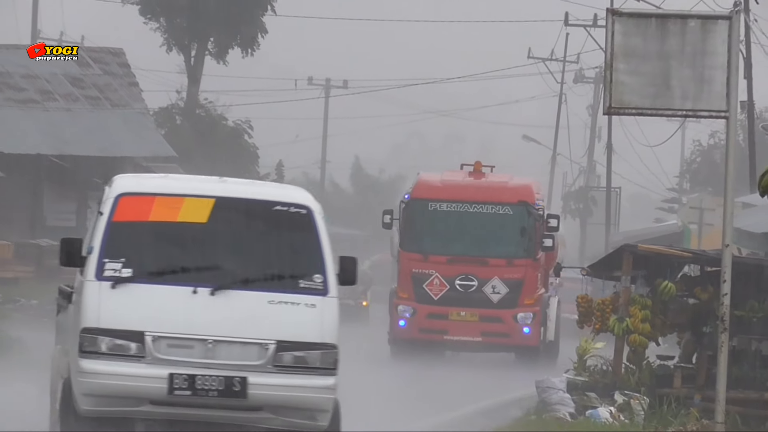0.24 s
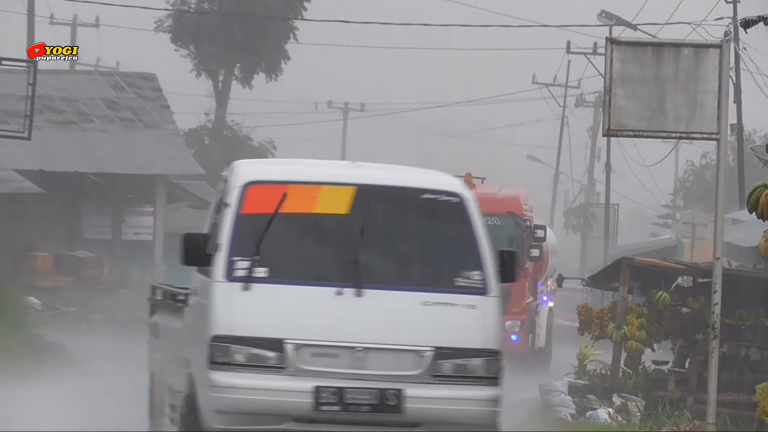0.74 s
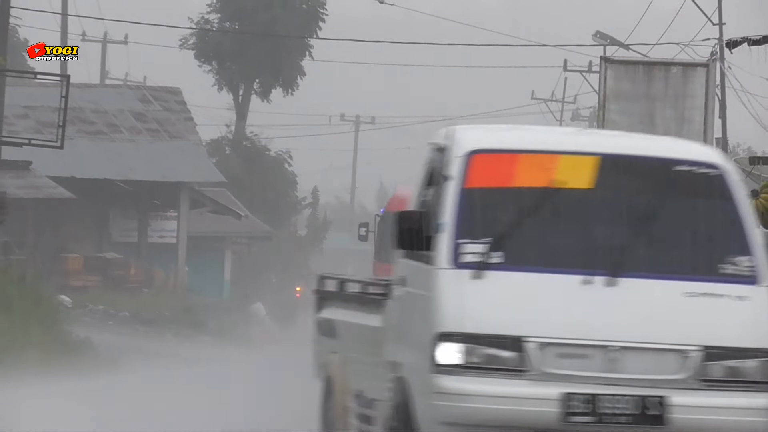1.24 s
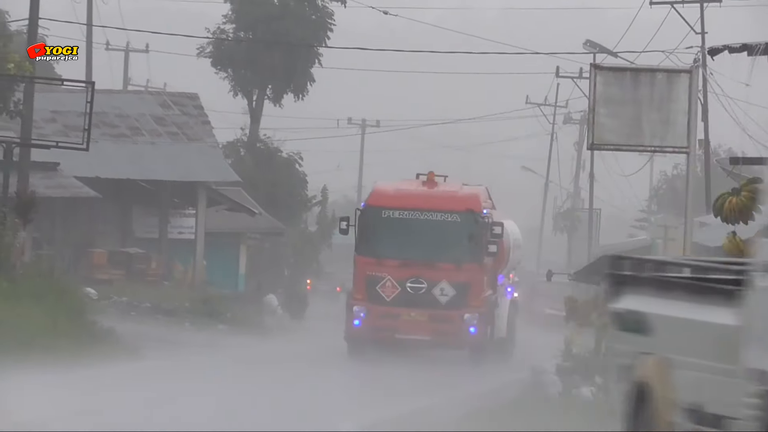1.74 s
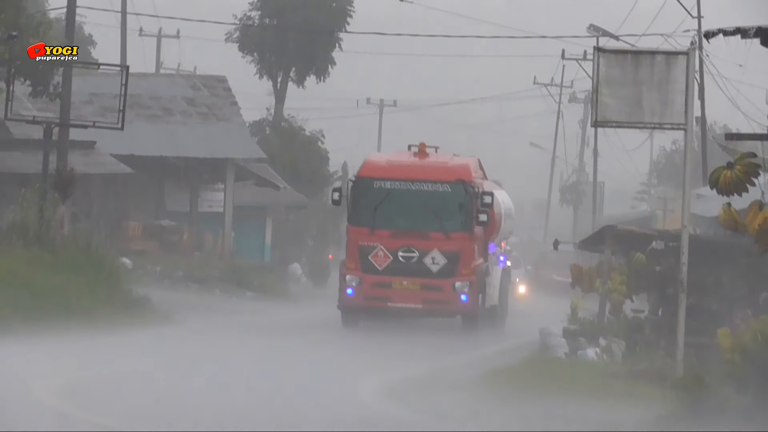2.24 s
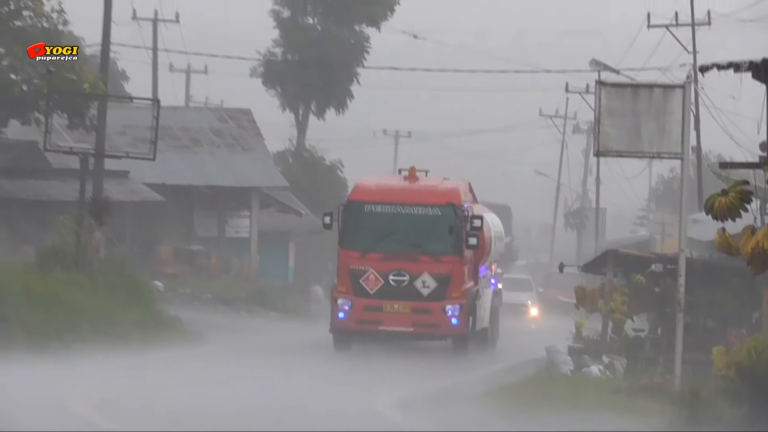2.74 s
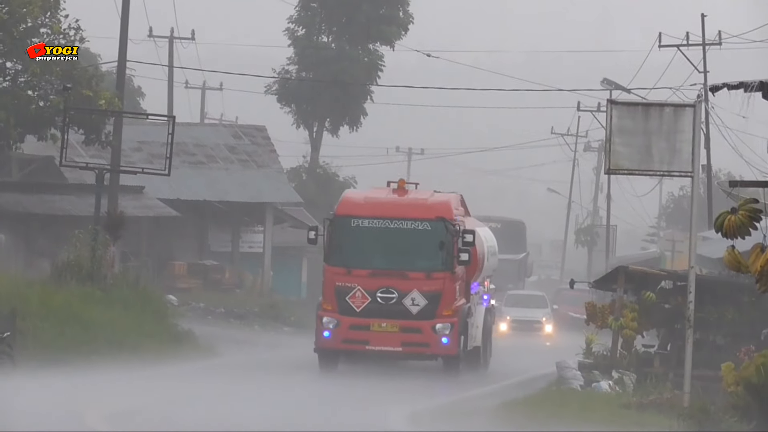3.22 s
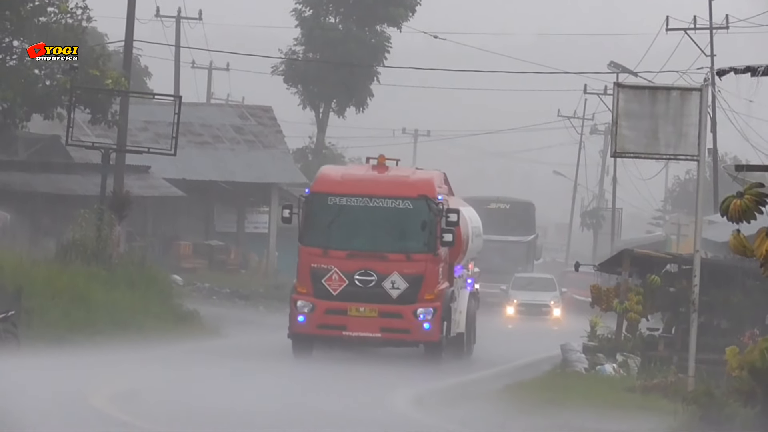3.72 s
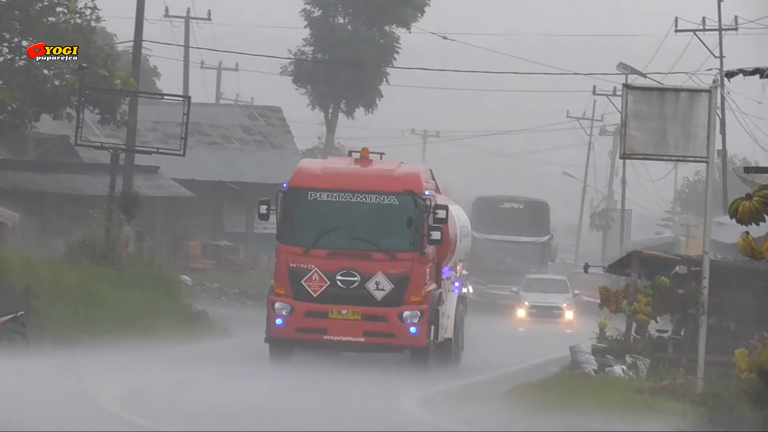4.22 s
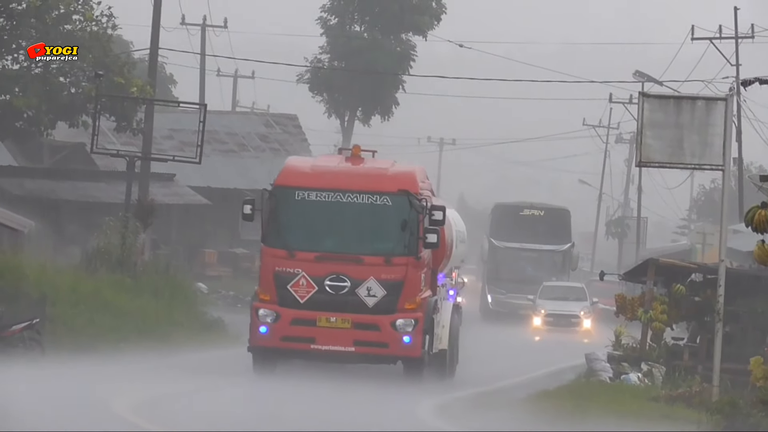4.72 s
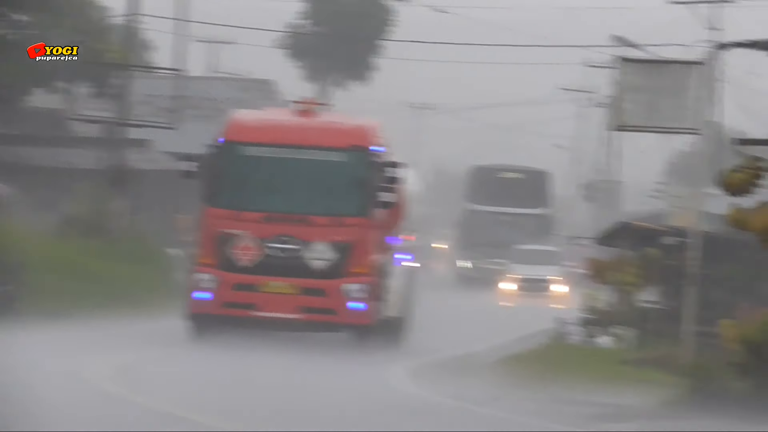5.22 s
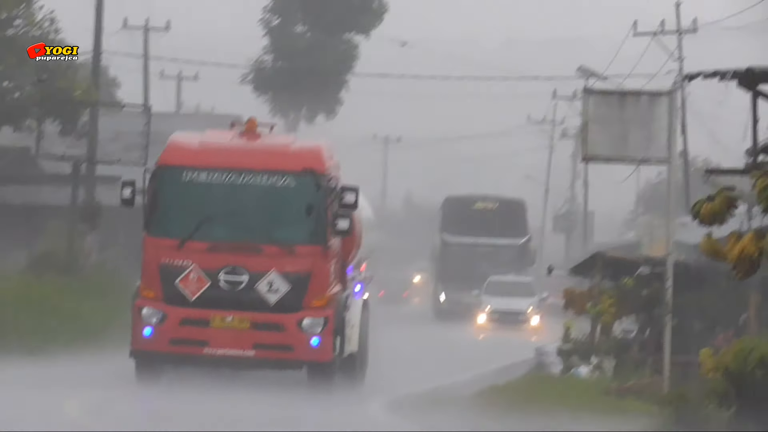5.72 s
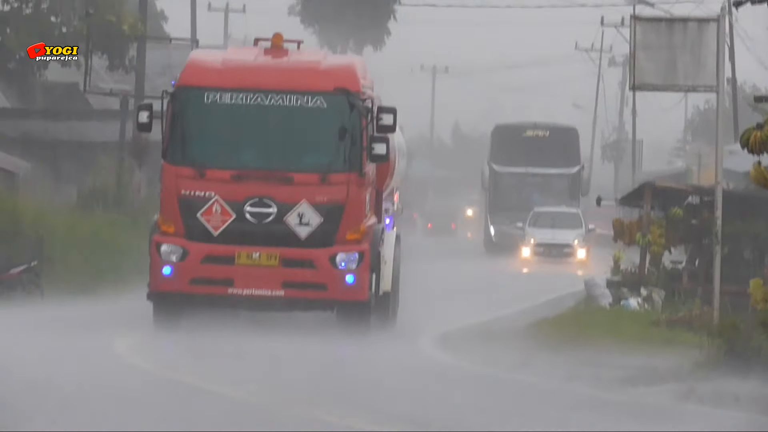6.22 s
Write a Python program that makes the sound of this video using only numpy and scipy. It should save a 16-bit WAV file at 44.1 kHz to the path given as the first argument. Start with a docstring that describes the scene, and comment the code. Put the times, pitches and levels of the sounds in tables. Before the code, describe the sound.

A small pickup with a droning engine passes in pouring rain, wet tyres singing, while traffic roars and a distant tanker truck rumbles.

```python
"""Heavy rain hisses on a main road while traffic roars and a distant tanker rumbles: shaped noise and random ticks.
A small pickup drives up and passes close by. Its four-cylinder exhaust is a stack of tones locked to the engine,
booming at first, then falling in pitch and turning hollow as it leaves.
Its wet tyres sing in narrow bands of noise, and the spray whistles once.
Later, fat drops smack down close by: sharp clicks and short fizzes that ring."""
import sys
import numpy as np
from scipy import signal
from scipy.fft import rfft, irfft, next_fast_len
from scipy.io import wavfile
from scipy.ndimage import uniform_filter1d, minimum_filter1d

SR = 44100
rng = np.random.default_rng(int(sys.argv[2]) if len(sys.argv) > 2 else 0)


def store_pcm(level_fs):
    """Save levels as 16-bit WAV."""
    pcm = np.round(np.clip(level_fs, -1, 1) * 32767).astype(np.int16)
    wavfile.write(sys.argv[1], SR, np.atleast_2d(pcm).T)


N = 284886

# How far each pitch leans to one side. Each row: frequency in Hz, left-right difference in dB (plus is left).
SIDE_LEAN = [(100, -1.5), (270, 2), (450, -3), (740, 1), (1220, 1.5), (2000, .5), (3500, 0.5), (6500, 2),
             (9000, 0.5), (12000, -3), (15000, -2.7)]


def from_db(db):
    """Turn decibels into a gain."""
    return 10 ** (np.asarray(db) / 20)


def rms_one(x):
    """Scale a sound to an average power of 1."""
    return x / np.sqrt(np.mean(x ** 2) + 1e-20)


def in_time(rows):
    """Draw straight lines between timed points: one value per sample for each column."""
    s, *columns = np.transpose(rows)
    return [np.interp(np.arange(N) / SR, s, column) for column in columns]


def at_hz(points, hz):
    """Read a curve over frequency, with equal musical steps equally far apart."""
    f, value = np.transpose(points)
    return np.interp(np.log(np.maximum(hz, 1)), np.log(f), value)


def panned(db):
    """Left and right gains for a level difference in dB; plus is louder on the left."""
    return from_db(np.array([[.5], [-.5]]) * db)


def drift(rate):
    """Slow random wandering with a typical size of 1; a higher rate in Hz wanders faster."""
    step = 40   # samples between the slow values
    r = np.exp(-2 * np.pi * step * rate / SR)
    pushes = rng.standard_normal(N // step + 2002)
    slow = signal.lfilter([1], [1, -2 * r, r * r], pushes)[2000:]   # skip the start-up
    return np.interp(np.arange(N) / step, np.arange(len(slow)), rms_one(slow))


def turning(hz):
    """Phase angle in radians of a tone whose frequency changes."""
    return 2 * np.pi * np.cumsum(hz) / SR


def ring(clicks, hz, width_hz):
    """A resonance rings at its own pitch, with gain 1 at its centre; a wider one dies away sooner."""
    r = np.exp(-np.pi * width_hz / SR)
    feed = np.array([1, 0, -1]) * (1 - r * r) / 2
    feedback = [1, -2 * r * np.cos(2 * np.pi * hz / SR), r * r]
    return signal.lfilter(feed, feedback, clicks + 1e-18)


def narrow_band(hz, width_hz):
    """Slow noise carried on a tone: a band of noise whose centre can move."""
    low_pass = signal.butter(2, width_hz / 2, fs=SR, output="sos")
    slow = signal.sosfilt(low_pass, rng.standard_normal((2, N)))
    angle = turning(hz)
    return rms_one(slow[0] * np.cos(angle) + slow[1] * np.sin(angle))


def noise(spectrum, flicker_db, flicker_rate):
    """Stereo noise with a flickering level: both sides much alike in the bass, less so in the treble."""
    # Each row: frequency in Hz, how alike left and right are (1 is identical).
    likeness = [(40, 0.99), (150, 0.78), (300, 0.85), (640, 0.7), (1400, 0.66), (3100, 0.33), (7000, 0.25),
                (15000, 0.13)]
    size = next_fast_len(N)
    hz = np.arange(size // 2 + 1) * SR / size
    mid, side = rfft(rng.standard_normal((2, size)))
    alike = np.clip(at_hz(likeness, hz), 0, 1)
    pair = np.sqrt(1 + alike) * mid + np.sqrt(1 - alike) * side * [[1], [-1]]
    pair = pair * panned(at_hz(SIDE_LEAN, hz))
    steady = irfft(pair * from_db(at_hz(spectrum, hz)), size)[:, :N]
    return rms_one(steady * from_db(flicker_db * drift(flicker_rate)))


def patter(spectrum, low_hz, high_hz, per_s, size_db, width_share, count=12):
    """Raindrops land at random all around; each is a tick of a few cycles at one of several pitches."""
    out = 0
    for hz in np.geomspace(low_hz, high_hz, count):
        at = np.flatnonzero(rng.random(N) < per_s / count / SR)
        size, place, lag, sign = rng.random((4, N // 20))[:, :len(at)]
        # many small drops, few big ones
        height_db = size_db * np.minimum(-np.log(1 - size), 4.5)
        height = from_db(height_db) * np.sign(sign - .5)
        clicks = np.zeros((2, N))
        clicks[0, at] = height * from_db(12 * (place - .5))
        # a lag of a few samples either way lets one side hear the drop first
        late = np.round(5.5 * (lag - .5)).astype(int)
        clicks[1, (at + late) % N] = height * from_db(12 * (.5 - place))
        width_hz = width_share * hz
        ticks = ring(ring(clicks, hz, width_hz), hz, width_hz)
        out = out + from_db(at_hz(spectrum, hz)) * panned(at_hz(SIDE_LEAN, hz)) * ticks
    return rms_one(out)


def rain_and_spray(wash_trim_db, spray_trim_db):
    """Far drops and thrown water merge into hiss, while nearer drops tick through it."""
    # Lower hiss of the water. Each row: frequency in Hz, strength in dB per Hz.
    wash_spectrum = [(900, -12.5), (1800, -4), (2700, -5), (3700, -1), (4700, -6), (5500, -9), (6300, -11),
                     (9000, -17), (15000, -40)]
    # Fine, high hiss. Each row: frequency in Hz, strength in dB per Hz.
    spray_spectrum = [(4000, -23), (6200, -8.5), (7200, -1), (8600, 2.5), (10000, 1.5), (12000, -3),
                      (14000, -9.5), (15500, -21)]
    # Each row: time in seconds, wash level in dB, fine spray level in dB, both before the trims.
    water_levels = [(0.15, -32, -29.5), (0.87, -32, -29), (1.84, -29.5, -24), (2.5, -30, -25),
                    (2.92, -31.5, -30.5), (3.2, -40, -38.5), (3.83, -33.5, -31), (4.31, -32.5, -30),
                    (4.64, -33, -30), (6.3, -30, -27.5)]
    # How far single drops stand out. Each row: time in seconds, tick level against the hiss in dB.
    patter_levels = [(0, -7), (1.2, -10), (2.4, -10.5), (3.2, -18), (4.0, -6.5), (6.46, -5)]
    wash_db, spray_db = in_time(water_levels)
    drops = from_db(in_time(patter_levels)[0])
    wash = noise(wash_spectrum, flicker_db=1.15, flicker_rate=14.5)
    wash = wash + drops * patter(wash_spectrum, 2010, 6500, per_s=2200, size_db=2.5, width_share=0.41)
    spray = noise(spray_spectrum, flicker_db=1.07, flicker_rate=15.6)
    spray = spray + drops * patter(spray_spectrum, 7740, 12300, per_s=2400, size_db=8.5, width_share=0.31)
    both = from_db(wash_db + wash_trim_db) * wash + from_db(spray_db + spray_trim_db) * spray
    # more ticking leaves less hiss, so the power stays the same
    return both / np.sqrt(1 + drops ** 2)


def traffic_roar(trim_db):
    """Many tyres on the wet road blend into a broad roar of noise."""
    # Each row: frequency in Hz, strength in dB per Hz.
    roar_spectrum = [(70, -23.5), (130, -1.5), (210, 3.5), (290, -0.5), (365, 6.5), (470, -1), (580, -4),
                     (700, 1), (880, -3), (990, -0.5), (1100, -5.5), (1230, -4.5), (1500, -11.5),
                     (2100, -15.5), (3200, -28), (6000, -34)]
    # Each row: time in seconds, roar level in dB before the trim.
    roar_levels = [(0.15, -21), (0.3, -19.5), (0.32, -20), (3.04, -29.5), (3.57, -25.5), (4.0, -19),
                   (4.79, -20), (6.3, -19.5)]
    level = from_db(in_time(roar_levels)[0] + trim_db)
    return level * noise(roar_spectrum, flicker_db=.5, flicker_rate=56)


def tanker():
    """A distant diesel, heard as an unsteady low rumble of noise."""
    # Each row: frequency in Hz, strength in dB per Hz.
    rumble_spectrum = [(20, -24), (35, -25), (50, -19), (65, 2), (90, -7), (120, 0), (170, -24), (300, -39)]
    # The tanker drawing nearer. Each row: time in seconds, rumble level in dB.
    rumble_levels = [(0, -42), (1.0, -48), (2.4, -49), (3.2, -49), (4.0, -35), (4.7, -44), (5.3, -33),
                     (6.46, -32)]
    return from_db(in_time(rumble_levels)[0]) * noise(rumble_spectrum, flicker_db=1.0, flicker_rate=8)


def doppler():
    """Pitch factor of a pickup passing at steady speed: high as it comes, low as it goes."""
    pass_s, distance_m = 3.32, 5.6   # when it is closest, and how close
    speed_m_per_s, sound_m_per_s = 15.4, 343
    along = speed_m_per_s * (np.arange(N) / SR - pass_s)
    receding = speed_m_per_s * along / np.hypot(along, distance_m)
    return 1 / (1 + receding / sound_m_per_s)


def exhaust(boom_db, hollow_db, flutter_db, wobble_db, uneven_db, puff_db):
    """Four firings a cycle make tones; one weak cylinder dents each cycle and fills in the lines between."""
    # Exhaust boom, strongest just before the pickup draws level.
    # Each row: time in seconds, level in dB before boom_db is added.
    boom_levels = [(0.05, -12), (1.94, -8), (2.44, -14), (2.72, -5), (2.86, -9), (2.97, -3.5), (3.6, -6.5),
                   (3.75, -18), (3.85, -13.5), (4.13, -20), (4.17, -36), (4.21, -27.5), (4.63, -19),
                   (4.67, -26.5), (5.21, -17), (6.01, -17), (6.12, -24.5), (6.4, -23)]
    # Hollow overtone that takes over behind it. Each row: time in seconds, level in dB before hollow_db.
    hollow_levels = [(0.14, -23), (1.03, -21.5), (1.55, -30), (3.57, -16.5), (3.71, -24), (3.87, -8.5),
                     (4.06, -19), (4.17, -11), (4.88, -11.5), (5.06, -15), (5.27, -11), (5.63, -24),
                     (5.75, -16), (6.4, -22)]
    # Each row: time in seconds, firing tone level in dB, growl level in dB.
    throb_levels = [(0, -46, -50), (1.6, -37, -27), (2.3, -42, -26), (2.9, -39, -20), (3.4, -37, -30),
                    (4.0, -32, -24), (5.0, -42, -32.5), (6.46, -46, -34)]
    # Growl lines. Each row: multiple of the engine cycle, level in dB against the growl.
    growl_orders = [(15, -8), (16, -0.5), (20, -5.5), (24, -16)]
    # Lines from the weak cylinder. Each row: multiple of the engine cycle,
    # level in dB against boom and overtone together, before uneven_db.
    uneven_orders = [(7, -22), (9, -16.5), (10, -15), (11, -17.5), (13, -21), (14, -28.5), (17, -41),
                     (19, -29)]
    # Puffs of gas. Each row: frequency in Hz, strength in dB per Hz.
    puff_spectrum = [(40, -45), (90, -38), (150, 3.5), (250, 17), (330, -2), (420, 2.5), (550, -12),
                     (1000, -9.5), (2000, -42)]
    cycles_per_s = 19.74   # steady revs, before the passing bends the pitch
    boom_order, hollow_order = 8, 12   # multiples of the engine cycle

    angle = turning(cycles_per_s * doppler()) + .005 * drift(14)
    boom = from_db(in_time(boom_levels)[0] + boom_db)
    hollow = from_db(in_time(hollow_levels)[0] + hollow_db)
    throb, growl = from_db(in_time(throb_levels))
    firing = np.cos(boom_order / 2 * angle)
    main = throb * firing + boom * np.cos(boom_order * angle) + hollow * np.sin(hollow_order * angle)
    # no two cycles burn quite alike
    main = main * from_db(wobble_db * drift(14.6))

    def lines(orders):
        """Clean tones, each fluttering a little in level and phase."""
        total = 0
        for order, db in orders:
            level = from_db(db + flutter_db * drift(5))
            total = total + level * np.cos(round(order) * angle + .22 * drift(5))
        return total

    # each firing also blows out a puff of turbulent gas
    puffs = (1 + .5 * firing) * noise(puff_spectrum, flicker_db=2.2, flicker_rate=16)
    rough = from_db(puff_db) * puffs - from_db(uneven_db) * lines(uneven_orders)
    return main + growl * lines(growl_orders) + np.hypot(boom, hollow) * rough


def singing_tyres(trim_db):
    """Water squeezed out of the tread rings in patchy bands that waver, then sink as the pickup nears."""
    # Each row: centre in Hz before the pitch factor, width in Hz, level in dB before the singing level,
    # left-right difference in dB.
    tyre_bands = [(1010, 51, -37, -1), (1208, 60, -40.5, 4), (1942, 126, -40.5, 0), (2477, 49, -44, -2),
                  (3023, 130, -46, -3), (3630, 410, -52, -7), (4755, 290, -41, 6), (5800, 180, -48.5, 4),
                  (8460, 2200, -41, -1), (10680, 2500, -42, -1)]
    # Each row: time in seconds, pitch factor of the bands.
    pitch_factors = [(0, 0.97), (1.3, 1.045), (2.0, 0.96), (2.45, .965), (3.0, .92)]
    # How strongly the tyres sing. Each row: time in seconds, level in dB before the trim.
    singing_levels = [(0, 1.5), (.8, -0.5), (1.8, 1.5), (2.2, -3.5), (2.42, -6), (2.65, -7), (3.05, -16),
                      (3.3, -40)]
    # One hollow band sweeps down as it goes by. Each row: time in seconds, centre in Hz, level in dB.
    swoosh_path = [(0, 1640, -50), (1.0, 1648, -43), (1.8, 1570, -45), (2.3, 1476, -38), (2.75, 1397, -38),
                   (3.0, 1192, -39), (3.5, 975, -48), (4.2, 980, -41), (6.46, 940, -46)]
    pitch, = in_time(pitch_factors)
    bands = 0
    for hz, width_hz, db, pan_db in tyre_bands:
        level = from_db(db + 1.3 * drift(5))
        bands = bands + level * panned(pan_db) * narrow_band(hz * pitch, width_hz)
    swoosh_hz, swoosh_db = in_time(swoosh_path)
    swoosh = from_db(swoosh_db) * narrow_band(swoosh_hz, width_hz=95)
    return from_db(in_time(singing_levels)[0] + trim_db) * bands + swoosh


def whistle(level_db, width_hz):
    """The spray whistles once: a narrow band of noise with a quick rise, then a fade."""
    start_s, attack_s, fade_s, pitch_hz = 2.35, .015, .15, 4700
    age = np.maximum(np.arange(N) / SR - start_s, 0)
    swell = np.minimum(age / attack_s, 1) * np.exp(-age / fade_s)
    return from_db(level_db) * swell * narrow_band(np.full(N, pitch_hz), width_hz)


def near_drops(trim_db, width_hz, splash_db, splash_s, size=2048):
    """A sharp smack, then a short fizz of thrown droplets, both ringing at the drop's pitch."""
    # Fat drops close by. Each row: start in seconds, peak level in dB before the trim, ring in Hz,
    # left-right difference in dB.
    fat_drops = [(4.0415, -8, 9160, 0.0), (4.1264, -11, 9890, 0.0), (4.4227, -5.5, 8190, 3),
                 (5.0032, -4, 7400, 5), (5.088, -7, 9100, -1.5), (5.241, -7.5, 9200, 0.0),
                 (5.3058, -7, 10500, -2.0), (5.7503, -8, 8910, 0.0), (6.0828, -5, 9300, 0.0),
                 (6.1464, -13, 9840, -2.0), (6.2575, -8, 10000, -0.5), (6.4459, 2, 9300, 1)]
    out = np.zeros((2, N + size))
    t = np.arange(size) / SR
    # so small a splash radiates only treble
    treble_only = signal.butter(4, 6800, "high", fs=SR, output="sos")
    for s, db, hz, pan_db in fat_drops:
        hit = from_db(splash_db) * rng.standard_normal((2, size)) * np.exp(-t / splash_s)
        hit[:, 0] += 1   # the smack itself
        tick = signal.sosfilt(treble_only, ring(ring(hit, hz, width_hz), hz, width_hz))
        at = round(s * SR)
        out[:, at:at + size] += from_db(db + trim_db) * panned(pan_db) * tick / np.abs(tick).max()
    return out[:, :N]


def scene():
    """Rain, traffic and tanker, with the pickup's exhaust and tyres and the fat drops on top."""
    water = rain_and_spray(wash_trim_db=3.0, spray_trim_db=2.0)
    roar = traffic_roar(trim_db=5.0)
    rumble = tanker()
    pickup = exhaust(boom_db=2.4, hollow_db=2.0, flutter_db=1.5, wobble_db=1.24, uneven_db=-3.0, puff_db=-19.5)
    pickup = pickup * panned(0.99)
    tyres = singing_tyres(trim_db=0.5) + whistle(level_db=-32.5, width_hz=110)
    smacks = near_drops(trim_db=0.5, width_hz=4200, splash_db=-18, splash_s=.0016)
    return water + roar + rumble + pickup + tyres + smacks


def record(dry, top=1.3):
    """A fast limiter ducks everything under loud peaks; what is left is rounded and the top treble cut."""
    hold_s, treble_stop_hz = 0.0056, 16000
    size = max(int(hold_s * SR), 1)
    headroom = np.minimum(top / (np.abs(dry).max(axis=0) + 1e-9), 1)
    # hold the lowest gain nearby, then smooth it
    gain = uniform_filter1d(minimum_filter1d(headroom, size), size)
    held = dry * gain
    rounded = held / (1 + held ** 16) ** (1 / 16)
    treble_cut = signal.cheby2(18, 70, treble_stop_hz, fs=SR, output="sos")
    return signal.sosfilt(treble_cut, rounded)


dry = scene()
out = record(dry)
store_pcm(out)
```